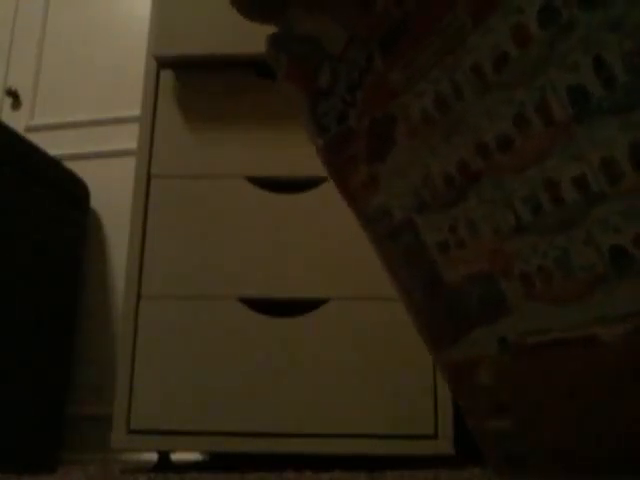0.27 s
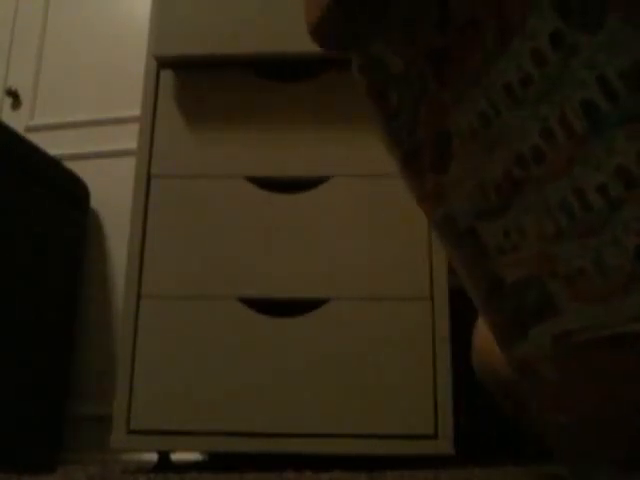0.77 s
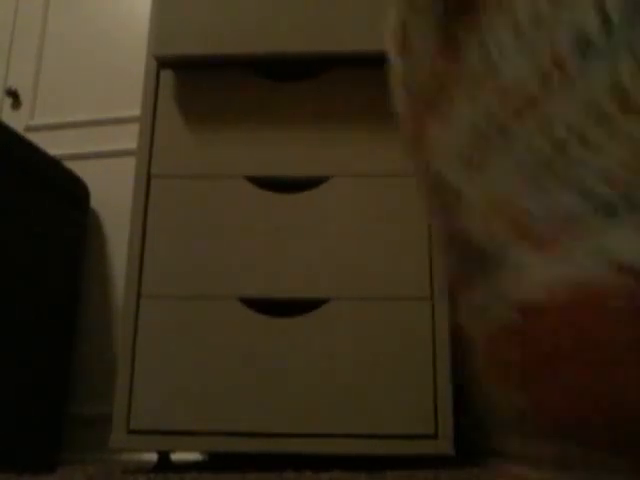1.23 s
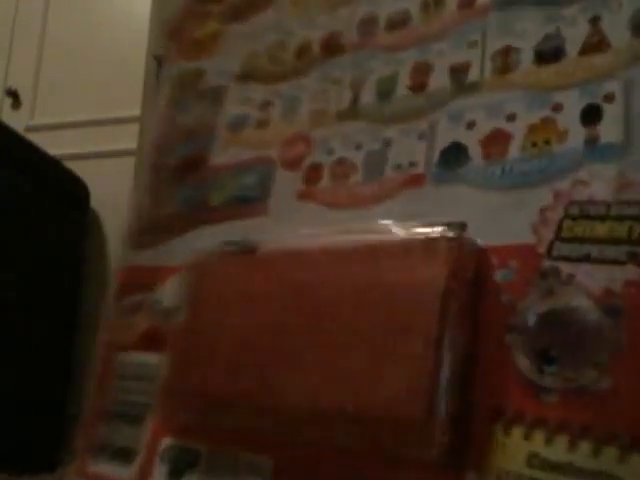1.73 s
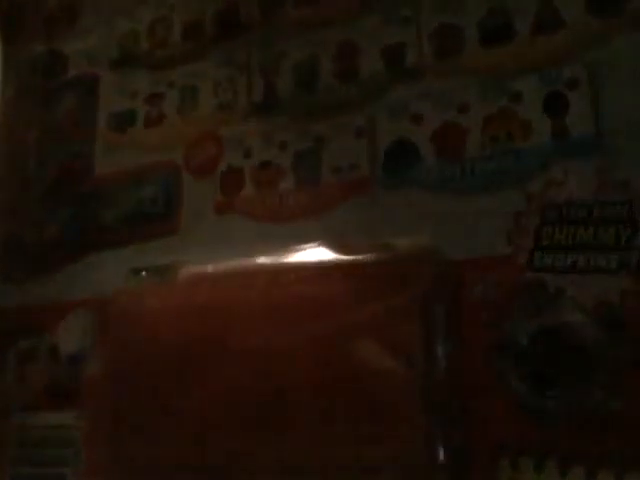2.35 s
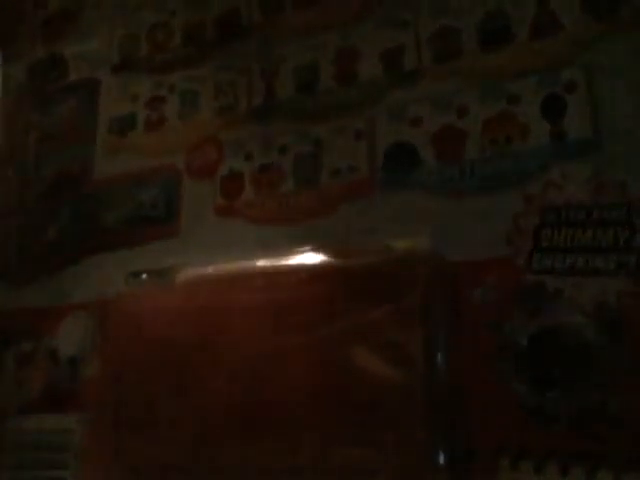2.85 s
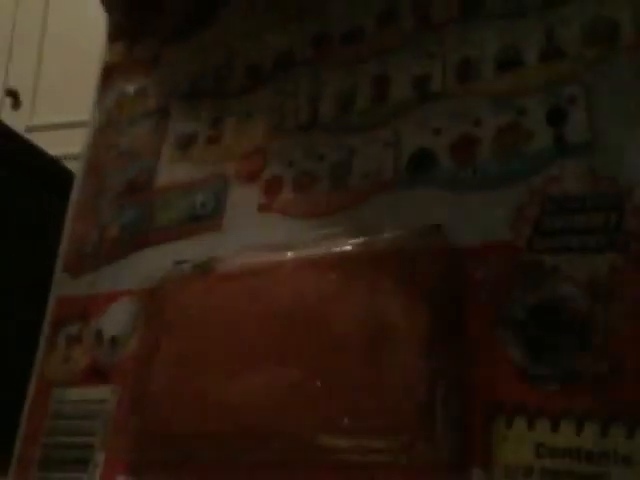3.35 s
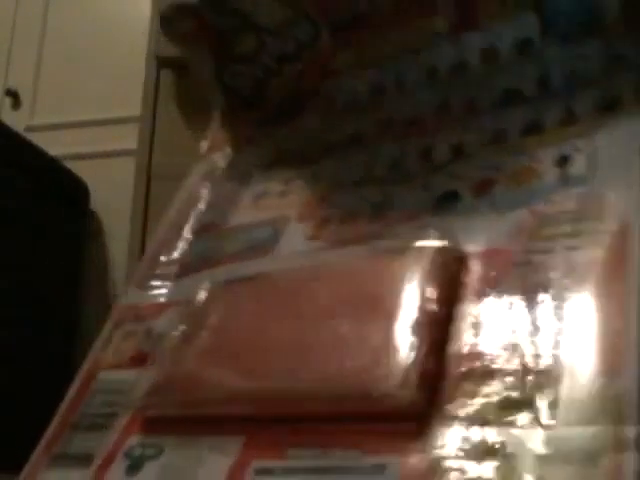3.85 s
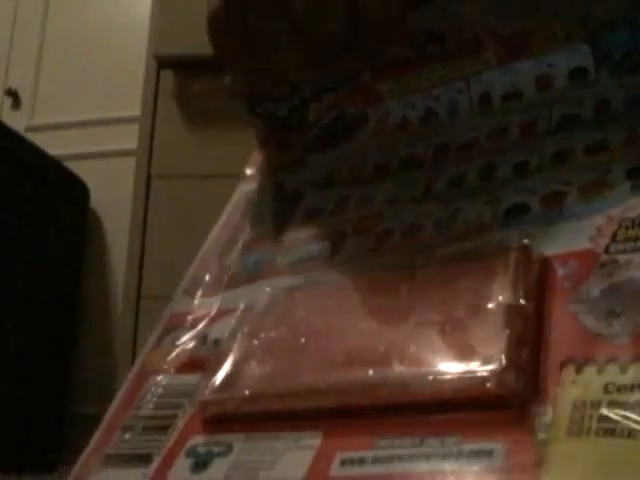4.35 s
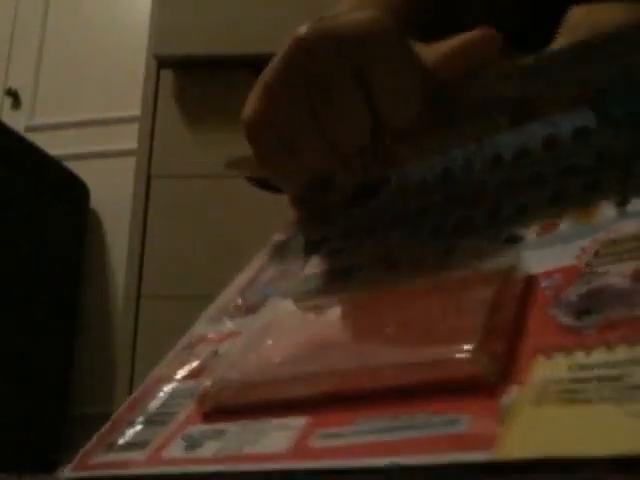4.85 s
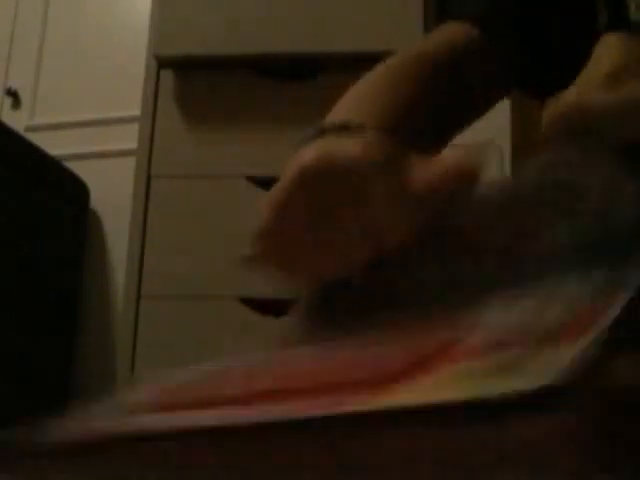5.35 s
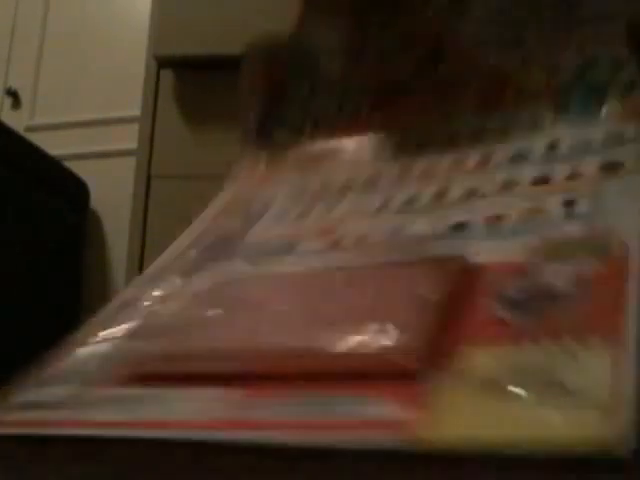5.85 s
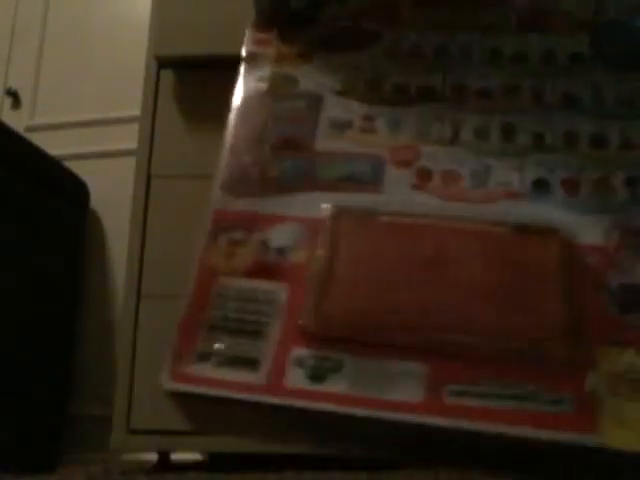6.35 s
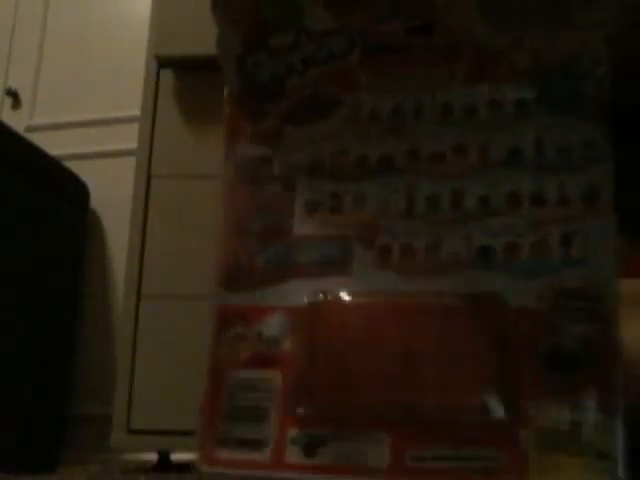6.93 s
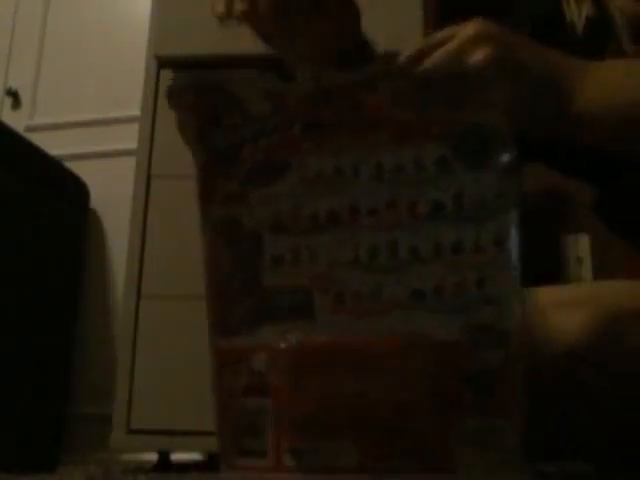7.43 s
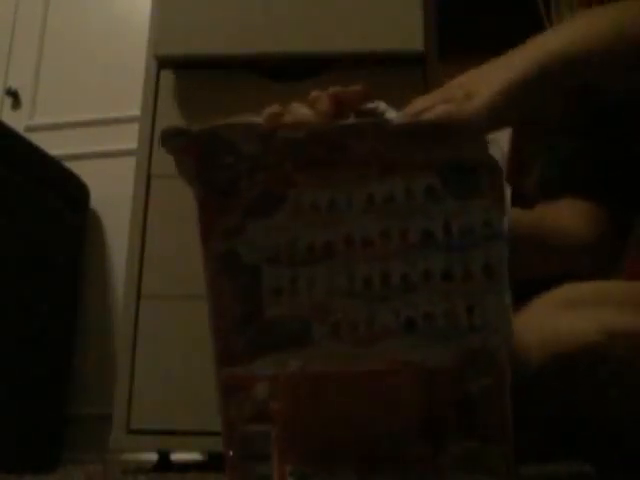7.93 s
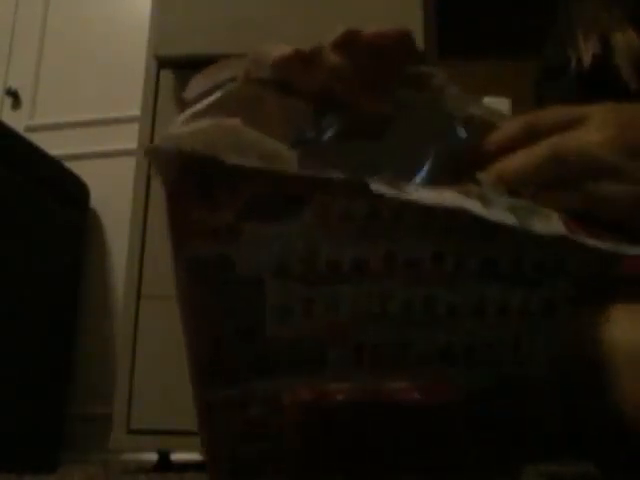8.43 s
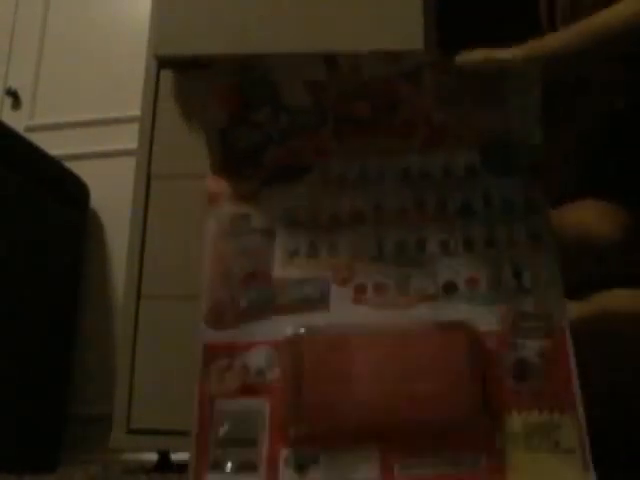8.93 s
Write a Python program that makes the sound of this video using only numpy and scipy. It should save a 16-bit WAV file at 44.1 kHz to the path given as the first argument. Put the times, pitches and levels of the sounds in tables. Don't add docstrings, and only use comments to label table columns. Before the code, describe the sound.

Very close handling of thin crisp film, stiff plastic shell and cardboard. Light rubbing and isolated snicks give way to an abrupt overloaded rip with clacks, then several bursts of snapping and popping as the pack is flexed. It calms into scattered rustles and small taps, and finishes with a few loud snaps. Dry small room, faint steady low hum.

```python
import sys
import numpy as np
from scipy import signal
from scipy.fft import rfft, irfft
from scipy.io import wavfile
from scipy.ndimage import uniform_filter1d

SR = 44100
rng = np.random.default_rng(int(sys.argv[2]) if len(sys.argv) > 2 else 0)


def ratio_of_db(decibels):
    return 10 ** (np.asarray(decibels, float) / 20)


def inscribe(sig):
    pcm = np.round(np.clip(np.atleast_2d(sig).T, -1, 1) * 32767)
    wavfile.write(sys.argv[1], SR, pcm.astype(np.int16))


N = 404397

# f/Hz, density/dB
FILM_SPECTRUM = [(2500, -16), (3500, 0), (5000, 5), (6500, 7), (8000, 2.5), (10000, -5.5), (13000, -17),
                 (15500, -25.5)]
# f/Hz, density/dB
SHELL_SPECTRUM = [(900, 2), (1500, -1.5), (2300, -2), (3000, -3.5), (4000, -3.5), (5000, -12.5)]


def rms_one(x):
    return x / np.sqrt(np.mean(x ** 2) + 1e-20)


def colour(x, spectrum):
    hz, db = np.transpose(spectrum)
    grid = np.log(np.fft.rfftfreq(4096, 1 / SR) + 1)
    ends = np.log([hz[0] / 4, *hz, hz[-1] * 4])
    log_gain = np.interp(grid, ends, [db[0] - 40, *db, db[-1] - 40]) * np.log(10) / 20
    cepstrum = irfft(log_gain)
    cepstrum[1:2048] *= 2
    cepstrum[2049:] = 0
    response = irfft(np.exp(rfft(cepstrum)))
    return signal.oaconvolve(x, response / np.sqrt(np.sum(response ** 2)))[:N]


def drift(rate_hz):
    r = np.exp(-2 * np.pi * rate_hz / SR)
    slow = signal.lfilter([1], [1, -2 * r, r * r], rng.standard_normal(N + SR))
    return rms_one(slow[SR:])


def add(track, s, piece):
    at = int(s * SR)
    track[at:at + len(piece)] += piece[:len(track) - at]


def snaps():
    # t/s, peak level/dB, shell part relative level/dB
    ticks = [(.5128, -17.5, -39), (.5882, -23, -8.5), (.61, -9.5, -18), (1.2935, -23, -8.5),
             (2.543, -14, -14), (2.5658, -18, -0.5), (2.7581, -23.5, -35), (2.7807, -20, -32.5),
             (3.0066, -16.5, -11), (3.019, 0, -10.5), (3.1478, -8.5, -12), (3.1704, -21.5, -10),
             (3.462, -27.5, 1), (3.582, -42, 5.5), (3.7219, -32, -15), (3.928, -20.5, -5.5),
             (4.1255, -11, -10), (4.3837, -5, -20), (4.7198, -26, -7), (4.7468, -25.5, -14),
             (4.7617, -3.5, -8), (4.7948, -12.5, -5), (4.8105, -11, -7), (4.8604, -29.5, 5),
             (4.8799, -13.5, -10), (4.9196, -1.5, -14), (5.218, -13.5, -11), (5.255, -3.5, -46),
             (5.7022, -4, -19.5), (8.8044, -12, -3.5)]
    cracks = [(.2039, -36, -20), (.3709, -30, 1.5), (1.491, -16, -9), (2.6367, -18.5, -35),
              (2.7048, -15, -38), (2.8776, -24, -28), (2.9392, -20.5, -12), (3.083, -12, -20),
              (3.303, -28, -17), (3.3251, -32.5, 5.5), (3.3515, -11, -10), (3.498, -35, 4.5),
              (3.5341, -12, -14.5), (3.98, -15.5, -11.5), (4.0093, -18.5, -9), (4.3026, -20.5, -11.5),
              (4.4765, -0.5, -9), (4.557, -23.5, -11.5), (5.4927, -20, -27), (5.563, -27, -9),
              (5.652, -22.5, -10), (6.269, -10, -19), (6.4398, -30.5, -13.5), (6.5093, -25, -11.5),
              (6.5602, -33.5, -6.5), (6.6888, -33.5, -28), (6.8897, -29, -16.5), (7.2958, -27.5, -1),
              (7.3542, -19, -7.5), (8.8343, -22.5, -8)]
    crunches = [(.6856, -41, -1), (.8918, -34.5, -8), (1.9066, -24.5, 3.5), (2.6755, -14, -18),
                (2.9096, -20.5, -14), (3.6343, -14.5, -8), (3.7642, -15, -8.5), (3.8872, -27.5, -6.5),
                (3.952, -13.5, -3), (4.0553, -23, -8), (4.0948, -19, -8.5), (4.253, -18.5, -19.5),
                (4.4518, -22.5, -11), (4.6577, -31, -2.5), (4.8922, -2.5, -2.5), (5.309, -21, -11.5),
                (5.333, -15, -10), (5.3454, -2, -12.5), (5.9353, -26, -6), (6.987, -24, -9.5),
                (7.2345, -30, -2.5), (7.423, -31, -4), (7.7083, -20, -12), (7.9275, -18, -10),
                (8.2415, -36.5, 3), (8.2771, -28, -6), (8.504, -48.5, 5), (8.9434, -23.5, -13),
                (8.993, -20.5, -10), (9.115, -11.5, -5)]
    flicks = [(0.0418, -47, 2), (0.32, -54, -1), (0.4696, -27.5, -9), (1.6094, -40.5, 1.5),
              (2.4438, -27.5, -20), (3.2171, -24, 0.5), (4.6445, -34.5, -8), (4.8228, -11, -10),
              (5.0526, -27.5, -2), (5.618, -23, -8), (6.7147, -39, -7.5), (7.1294, -42, -12),
              (7.6311, -38, 2), (8.057, -29.5, -19), (8.4457, -36, -2), (8.493, -47, 11.5),
              (8.9121, -38, 5), (9.1273, -17, -23)]
    snicks = [(0.0275, -37, -14.0), (0.1127, -29.5, -12), (0.3327, -31, -25.0), (0.384, -16, -9),
              (0.5942, -27, -10), (0.7064, -19.5, -23.0), (0.8108, -37, -10), (0.8916, -39.5, -26),
              (1.2404, -39, -19), (1.3496, -30.5, -7), (1.4821, -42, -4), (1.8945, -27, -15),
              (1.9258, -36.5, -1), (1.9713, -31.5, 0.5), (2.0593, -34, -13.0), (2.1834, -37.0, -5),
              (2.2347, -46, -23.0), (2.2856, -36, 3.5), (2.3244, -37.5, -19.0), (2.4606, -22, -27),
              (2.5369, -24, -1.5), (2.5769, -28, -12), (2.6543, -21.5, -25), (2.6694, -19.5, -22),
              (2.6829, -13, -19), (2.8096, -27, -21.5), (2.8608, -25, -28), (3.1633, -14.5, -19.0),
              (3.1706, 4.5, -18.5), (3.3963, -23, -3), (3.4793, -37.5, 1.5), (3.5146, -19, -25.0),
              (3.7617, -1, -8), (3.8695, -24, -5.5), (4.0226, -10, -8.5), (4.0648, -18.5, -17.0),
              (4.0852, -25, -12), (4.1999, -20.5, -11), (4.3339, -22.5, -13), (4.6226, -35, -13),
              (4.762, -6, -7), (4.8323, -14.5, -6.0), (5.0037, -27, -0.5), (5.2547, -10, -35.0),
              (5.3249, -21, -26), (5.4931, -18, -17), (5.6294, -20, -16.0), (5.8181, -22.5, -8),
              (5.9054, -21.5, -10), (5.925, -25.5, -19), (6.1151, -29, -23), (6.6892, -20.5, -24),
              (6.7958, -33, -9), (7.2861, -34.0, 1), (7.3129, -25, -2.5), (7.4244, -34.5, 1),
              (7.4844, -40.5, -0.5), (8.7685, -16, -10), (9.0182, -24.5, 2.5), (9.1149, 4.5, -48)]
    nicks = [(0.623, -25, -14), (0.697, -22.5, -5), (1.301, -25.5, -26), (2.11, -41, -1), (2.369, -46, 1),
             (2.411, -26, -13.5), (2.8, -32, -0.5), (2.804, -31, -14.5), (2.838, -32.5, -26),
             (3.094, -10.5, -31), (3.108, -14.5, -22), (3.669, -32, -27), (3.694, -36, -19),
             (3.859, -36, -6), (4.036, -27, -11.5), (4.102, -16.5, -8), (4.2185, -26.5, -4),
             (4.231, -19, -4), (4.2375, -17, -10), (4.35, -25, -7), (4.416, -36, -10), (4.529, -20.5, -18),
             (4.906, -19, -27), (5.288, -25.5, -36), (5.843, -27, -10), (5.9786, -27, -15),
             (8.107, -38, -17.0), (8.2394, -33.5, -10), (8.322, -40.0, 2.0), (8.393, -42, -13),
             (8.4075, -37.5, 9.5), (8.4758, -49, 2), (8.565, -33, -6.5), (8.695, -36, -16)]
    tick_t60_s, crack_t60_s, crunch_t60_s, snick_t60_s = 0.0053, 0.013, 0.023, 0.0038
    kinds = [(ticks, tick_t60_s), (cracks, crack_t60_s), (crunches, crunch_t60_s),
             (flicks, crack_t60_s), (snicks, snick_t60_s), (nicks, tick_t60_s)]
    rows = [(*row, t60) for kind, t60 in kinds for row in kind]

    t = np.arange(int(.06 * SR)) / SR
    film, shell = np.zeros(N), np.zeros(N)
    noise = rng.standard_normal((len(rows), 2, len(t)))
    crack = int(.0016 * SR)
    before = np.maximum(t[crack] - t, 0)
    after = np.maximum(t - t[crack], 0)
    noise[:, :, crack] = 4.5
    for (s, db, shell_db, t60), (film_noise, shell_noise) in zip(rows, noise):
        swell = ratio_of_db(-110 * before / t60)
        shiver = ratio_of_db(-29 - 14 * after / t60)
        shape = swell * (ratio_of_db(-60 * after / t60) + shiver)
        add(film, s, ratio_of_db(db - 9.5) * shape * film_noise)
        add(shell, s, ratio_of_db(db + shell_db - 2.5) * shape * shell_noise)
    return colour(film, FILM_SPECTRUM) + colour(shell, SHELL_SPECTRUM)


def pops():
    # t/s, peak level/dB, f/Hz
    knocks = [(.366, -26.5, 413), (1.49, -29, 382), (1.59, -31, 323), (1.695, -30, 298), (1.8, -31.5, 320),
              (1.972, -22, 308), (2.111, -22, 370), (2.25, -30.5, 314), (2.327, -28.5, 370),
              (2.368, -25.5, 370), (2.591, -24.5, 434), (2.87, -29, 328), (3.011, -9, 420),
              (3.021, -11, 450), (3.123, -15.5, 315), (3.17, -13.5, 282), (3.352, -27, 310),
              (3.535, -26, 327), (3.954, -12, 363), (4.763, -15, 285), (7.295, -26.5, 300),
              (7.426, -27.5, 406), (7.926, -26, 378)]
    wall_pops = [(.199, -26.5, 670), (0.317, -29, 629.6), (.895, -37, 564), (1.906, -14.5, 480),
                 (2.287, -22.5, 462), (2.411, -24, 473), (2.638, -21.5, 573), (2.758, -23, 505),
                 (3.761, -9.5, 525), (4.125, -24.5, 537), (4.479, -13, 736), (4.9203, -5.5, 660),
                 (5.652, -18.5, 516), (6.896, -24, 450), (7.395, -22, 682), (7.71, -23.5, 654),
                 (8.24, -25.5, 680), (8.491, -19, 602), (8.982, -24, 453.1), (9.115, -9, 648)]
    clacks = [(1.905, -20, 1300), (2.564, -35, 1030), (2.667, -24, 759.4), (3.078, -2, 1020),
              (3.15, -8, 810), (3.396, -23.5, 760), (3.461, -25, 826), (3.631, -27, 1020),
              (4.096, -20.5, 830), (4.198, -23, 870), (4.226, -30.5, 870), (4.813, -12, 1470),
              (4.475, -1, 946), (4.525, -20.5, 750), (4.644, -24, 910), (4.681, -24.5, 1090),
              (4.712, -24.5, 990), (4.732, -31, 910), (4.811, -14.5, 984), (4.859, -7, 955),
              (4.892, 0.5, 754), (5.217, -16.5, 853), (5.336, -20.5, 960), (5.978, -23.5, 820),
              (6.272, -24.5, 1200), (6.989, -24, 850), (7.233, -24.5, 1200), (7.354, -26, 1006),
              (8.804, -12.5, 953), (8.901, -27, 875)]
    bumps = [
        (1.908, -27, 165),
        (5.4, -28, 135),
        (5.653, -24.5, 342),
        (8.992, -40, 171),
        (9.01, -19.5, 151),
    ]
    taps_and_plucks = [(0.083, -39, 490), (0.499, -39, 1680), (0.575, -33, 1390.0), (0.655, -25, 2170),
                       (0.81, -38, 550.0), (1.887, -25, 640), (2.074, -24.5, 312), (2.276, -30.5, 940),
                       (2.326, -42, 414), (2.439, -27, 480), (2.564, -28, 1030), (2.718, -30.5, 314),
                       (2.96, -44, 450.0), (3.055, -8.5, 376), (3.308, -28, 523), (3.363, -26, 1090),
                       (3.434, -39.0, 540.0), (3.546, -26, 503), (3.617, -32.5, 734), (3.861, -28.5, 840.0),
                       (3.886, -27.5, 890), (4.056, -24, 920), (4.335, -27.5, 870), (4.353, -24.5, 2000),
                       (4.373, -41, 1130), (4.548, -26, 850), (4.586, -38, 1200), (4.693, -24, 775),
                       (4.978, -32, 1040), (5.847, -39, 370.0), (5.949, -36, 460), (6.127, -46.5, 250.0),
                       (6.702, -42, 995), (6.714, -34, 800), (7.137, -38, 736.4), (7.256, -27.5, 990.0),
                       (7.383, -30.5, 307), (7.622, -31.5, 620), (7.715, -27.5, 664), (8.058, -36, 600.0),
                       (8.264, -29, 701.4), (8.346, -37, 503), (8.71, -27, 1180), (9.003, -19.5, 655),
                       (9.065, -28, 820)]
    plucks = [(0.043, -35, 585), (0.285, -37, 4760), (0.592, -33, 4800.0), (0.604, -27.5, 4860),
              (0.618, -25, 4700), (0.634, -28, 2200.0), (0.648, -35, 4700), (0.698, -33, 2380),
              (0.707, -31.5, 6200), (0.74, -28, 664), (1.369, -36.5, 399.8), (1.59, -29.5, 1010),
              (1.695, -33, 1050), (1.798, -38, 950), (1.85, -33, 710), (2.184, -37, 800.0),
              (2.203, -39, 700.0), (2.212, -33, 830), (2.298, -44, 905), (2.35, -34, 890),
              (2.478, -36, 450.0), (2.493, -37, 600.0), (2.815, -32, 466), (2.911, -27.5, 495),
              (3.016, 1.5, 683), (3.024, -2, 590), (3.072, -7.5, 905), (4.01, -29.5, 940),
              (4.023, -25, 900), (4.036, -29.0, 885), (4.16, -30, 920.0), (4.254, -24.5, 950),
              (4.302, -29, 900), (5.351, -10, 2650), (5.37, -12, 3270), (7.226, -31, 1100),
              (7.339, -31, 1490), (8.407, -31, 1340), (8.446, -34, 490)]
    # start t/s, end t/s, slip rate/Hz, f/Hz, peak level/dB
    creaks = [
        (1.981, 2.05, 95, 367, -26),
    ]
    slips = []
    for start, end, per_s, hz, db in creaks:
        slips += [(s, db, hz) for s in np.arange(start, end, 1 / per_s)]
    uneven = rng.normal(0, [.0005, 1.5, 25], (len(slips), 3))
    rows = np.vstack([knocks, wall_pops, clacks, bumps, taps_and_plucks, plucks, slips + uneven])

    t = np.arange(int(.08 * SR)) / SR
    out = np.zeros(N)
    chance = rng.random((len(rows), 4))
    for (s, db, hz), (below, above, phase, turn) in zip(rows, chance):
        t60 = 0.021 + 3.1 / hz
        cycles = hz * (t + 0.00067 * (1 - np.exp(-t / 0.00044)))
        lower = np.sin(2 * np.pi * ((0.422 + 0.33 * below) * cycles + phase))
        upper = np.sin(2 * np.pi * ((1.342 + 1.0 * above) * cycles + turn))
        wave = np.sin(2 * np.pi * cycles)
        wave += 0.5 * lower * (1 - np.exp(-t / 0.00056))
        wave += 0.69 * upper * ratio_of_db(-40 * t / t60) * min(1, 1600 / hz)
        shape = (1 - np.exp(-t / 0.00053)) * ratio_of_db(-60 * t / t60)
        add(out, s + 0.001011, ratio_of_db(db - 1.5) * shape * wave)
    return signal.sosfilt(signal.butter(2, 110, "high", fs=SR, output="sos"), out)


def parts(db, lean_db):
    return ratio_of_db(db + np.array([0, 0.33 * lean_db - 3, lean_db]))


def grips():
    # start t/s, end t/s, film rustle level/dB, lean towards the card/dB
    grip_rows = [(0, .3, -59.5, 4), (0.268, 0.76, -52.5, 1), (.8, 1.42, -67.5, -1.5),
                 (1.504, 1.515, -59.5, 1), (1.626, 1.813, -57.5, 1.5), (1.843, 2.086, -53.5, 2.5),
                 (2.197, 2.49, -53, -2), (2.505, 2.735, -45, -8), (2.795, 2.96, -50, -2.5),
                 (2.995, 3.12, -40.5, -7.5), (3.3, 3.397, -50.5, 4), (3.49, 3.543, -54, 5),
                 (3.69, 3.92, -48.5, -1.5), (3.95, 4.235, -45.5, -2), (4.27, 4.556, -50.5, 2),
                 (4.692, 4.84, -53.5, 10), (4.784, 4.95, -43.5, 0), (5.0, 5.07, -50, 2),
                 (5.221, 5.495, -42.5, -3), (5.527, 5.983, -51, -0.5), (6.02, 6.21, -59, 1),
                 (6.27, 6.385, -61.5, 2), (6.477, 6.559, -55.5, 1), (6.69, 7.057, -59, 2),
                 (7.177, 7.451, -55, 3.5), (7.647, 7.954, -50, -1), (8.055, 8.39, -49, -1),
                 (8.46, 8.64, -57, -7), (8.722, 8.765, -38.5, -2.5), (8.866, 9.21, -49, 0)]
    rise_db_per_s, fall_db_per_s = 184.5, 206.5
    t, gains = np.arange(N) / SR, np.zeros((3, N))
    for start, end, db, lean_db in grip_rows:
        span = slice(int(max(start - .3, 0) * SR), int((end + .3) * SR))
        rise_db = rise_db_per_s * np.maximum(start - t[span], 0)
        fall_db = fall_db_per_s * np.maximum(t[span] - end, 0)
        grip = np.outer(parts(db, lean_db), ratio_of_db(-rise_db - fall_db))
        gains[:, span] = np.maximum(gains[:, span], grip)
    return gains


def rips():
    # start t/s, end t/s, film level/dB, lean towards the card/dB
    rip_rows = [(0.195, 0.238, -40, -2), (0.364, 0.438, -39.5, -1.5), (0.605, 0.684, -48, 2),
                (0.681, 0.745, -38.5, -3.5), (1.212, 1.28, -52.5, 5), (1.287, 1.379, -52.5, -1.5),
                (2.526, 2.57, -50.5, -3), (3.006, 3.019, -12.5, 7), (3.015, 3.1, -15.5, -2.5),
                (3.177, 3.242, -45.5, 17.5), (3.353, 3.386, -39, 1.5), (3.718, 3.77, -34, -12.5),
                (3.758, 3.797, -30, 2.5), (4.473, 4.5, -23, 6), (4.793, 4.839, -40.5, 12),
                (4.919, 4.927, -35.5, 22), (5.19, 5.234, -39.5, -6.5), (5.338, 5.348, -14, -35),
                (5.354, 5.415, -25.5, -4.5), (6.267, 6.31, -42, 1), (6.884, 6.952, -40.5, -0.5),
                (7.919, 7.96, -45, -18), (8.977, 9.031, -45, 15), (9.111, 9.157, -25.5, -23)]
    attack_s, sag_total_db, release_db_per_s = 0.0011, 10.5, 1198.5
    t, gains = np.arange(N) / SR, np.zeros((3, N))
    for start, end, db, lean_db in rip_rows:
        span = slice(int(start * SR), int((end + .05) * SR))
        since = t[span] - start
        sag_db = sag_total_db * since / (end - start)
        release_db = release_db_per_s * np.maximum(t[span] - end, 0)
        shape = np.clip(since / attack_s, 0, 1) * ratio_of_db(-sag_db - release_db)
        gains[:, span] += np.outer(parts(db, lean_db), shape)
    return gains


def crackle(per_s, spread_db, clump_db, clump_rate, smooth, low_hz, high_hz):
    born = rng.random(N) < per_s * ratio_of_db(clump_db * drift(clump_rate)) / SR
    sizes = ratio_of_db(spread_db * np.minimum(rng.exponential(1, N), 3.1)) * rng.choice([-1, 1], N)
    facet, rings = rng.integers(0, 10, N), np.zeros(N)
    for k, hz in enumerate(np.geomspace(low_hz, high_hz, 10)):
        r = np.exp(-np.pi * hz / 5.0 / SR)
        poles = [1, -2 * r * np.cos(2 * np.pi * hz / SR), r * r]
        hits = born * sizes * (facet == k)
        rings += signal.lfilter([1 - r * r, 0, r * r - 1], poles, hits + 1e-18)
    return np.sqrt(1 - smooth) * rms_one(rings) + np.sqrt(smooth) * rng.standard_normal(N)


def rustle():
    # f/Hz, density/dB
    card_spectrum = [(40, -24), (130, -9), (230, -3.5), (390, -4), (560, -3), (900, -5), (1250, -14.5),
                     (2000, -44)]
    film_gain, shell_gain, card_gain = grips() + rips()
    fine = crackle(1100, 3.8, 5, 45, .55, 1300, 13000)
    coarse = crackle(450, 2.4, 3, 25, .62, 220, 2500)
    film = colour(film_gain * ratio_of_db(0.28 * drift(25)) * fine, FILM_SPECTRUM)
    shell = colour(shell_gain * ratio_of_db(2 * drift(28)) * fine, SHELL_SPECTRUM)
    card = colour(card_gain * ratio_of_db(-5.5 + 2 * drift(26)) * coarse, card_spectrum)
    return film + shell + card


def rubs():
    rub_rows = [
        (1.31, 1.368, 2560, 4870, -47),
        (3.96, 4.1, 800, 2300, -50),
        (3.95, 4.47, 9000, 12500, -58.5),
        (2.25, 3.3, 9500, 12500, -66.5),
        (5.4, 6.1, 1860, 1740, -65.5),
    ]
    t, out = np.arange(N) / SR, np.zeros(N)
    friction = rng.standard_normal(N) * ratio_of_db(2 * drift(60))
    for start, end, low_hz, high_hz, db in rub_rows:
        fade_s = 0.0076 + 0.12 * (end - start)
        drag = friction * np.clip(np.minimum(t - start, end - t) / fade_s, 0, 1)
        for hz in (low_hz, high_hz):
            hollow = signal.iirpeak(hz, 3.5, fs=SR)
            once = signal.lfilter(*hollow, drag + 1e-18)
            out += ratio_of_db(db + 18.5) * signal.lfilter(*hollow, once)
    return out


def room(x):
    t60_s, level_db = .2, -21
    t = np.arange(int(.4 * SR)) / SR
    cloud = rng.standard_normal(len(t)) * ratio_of_db(-60 * t / t60_s) * (t > .003)
    cloud = signal.lfilter([1], [1, -.65], cloud)
    return ratio_of_db(level_db) * signal.fftconvolve(x, cloud / np.sqrt(np.sum(cloud ** 2)))[:N]


def room_hum():
    # f/Hz, density/dB
    hum_spectrum = [(25, -12), (45, -15.5), (75, -5.5), (140, -1), (400, -15.5), (1800, -33.5), (6500, -41),
                    (12000, -27)]
    level_db = -60 + 0.3 * drift(1.7)
    return ratio_of_db(level_db) * colour(rng.standard_normal(N), hum_spectrum)


def two_channels(mid):
    side_db = -10
    threshold = .2 - .2 * (drift(12) > 1.8)
    parted = uniform_filter1d(np.abs(mid), 1500) > threshold
    side = ratio_of_db(side_db) * (np.gradient(mid) + mid / 5) * drift(300) * parted
    return np.array([mid + side, mid - side])


def scene():
    pack = snaps() + pops() + rustle() + rubs()
    return two_channels(pack + room(pack) + room_hum())


def top_cut(x):
    return signal.sosfilt(signal.butter(12, 14700, fs=SR, output="sos"), x)


def record(dry):
    clipped = np.clip(dry, -.97, .97)
    mix = signal.sosfilt(signal.butter(10, 15300, fs=SR, output="sos"), clipped)
    return top_cut(mix)


dry = scene()
out = record(dry)
inscribe(out)
```